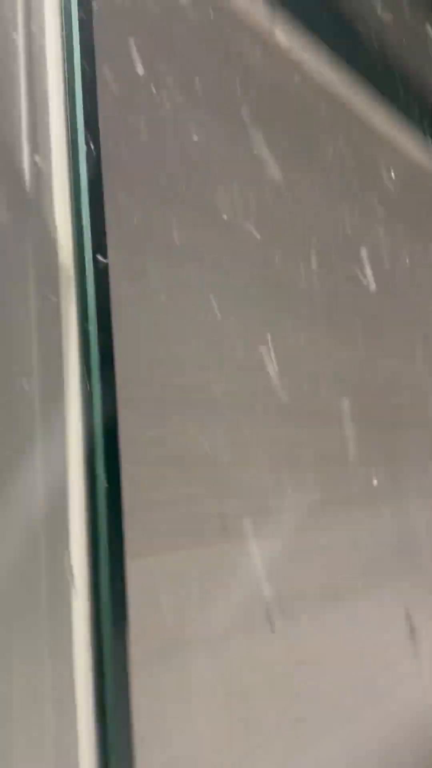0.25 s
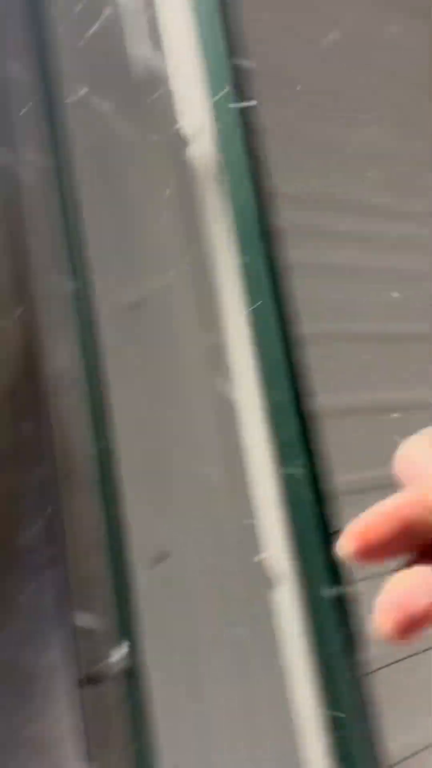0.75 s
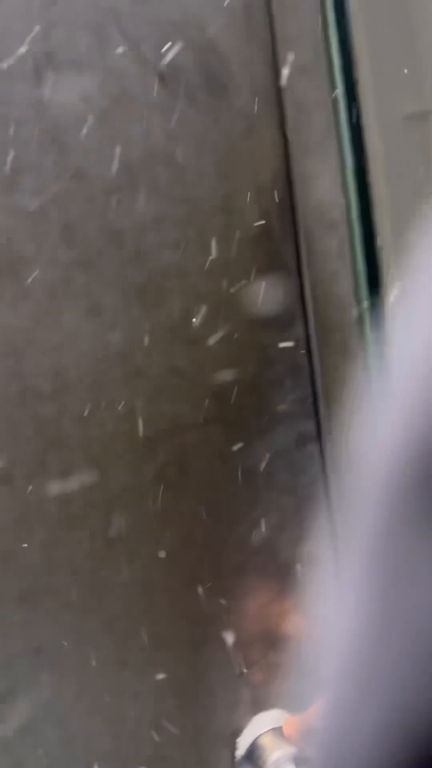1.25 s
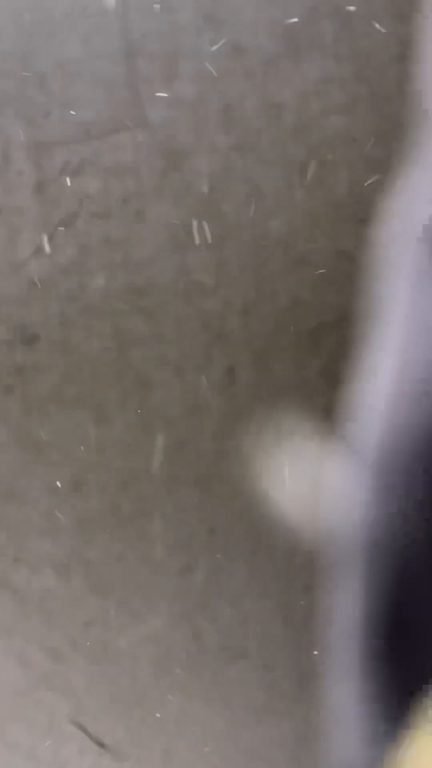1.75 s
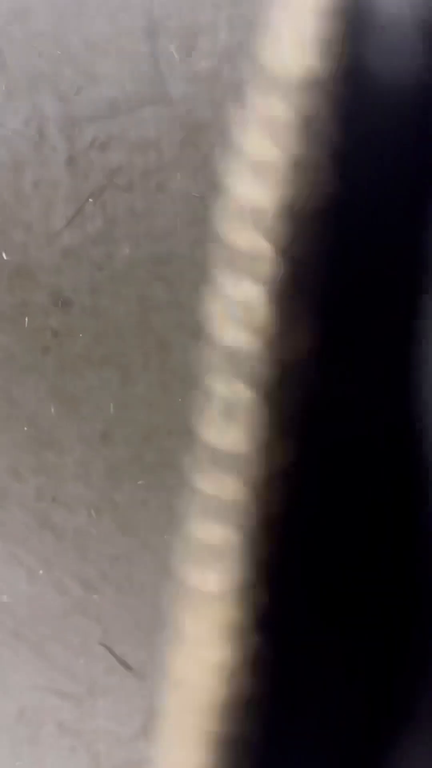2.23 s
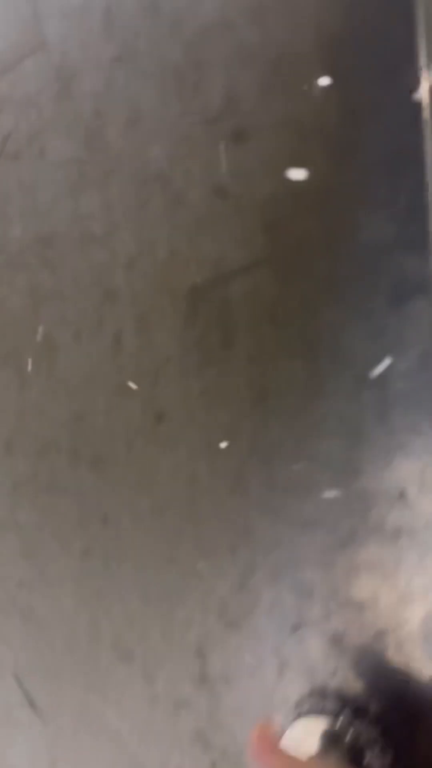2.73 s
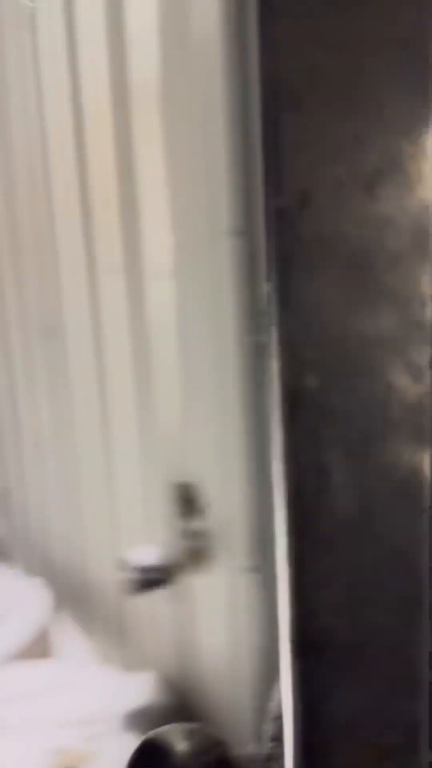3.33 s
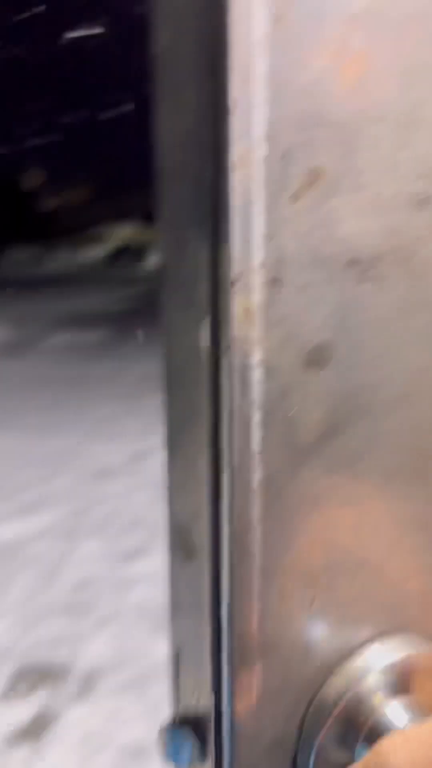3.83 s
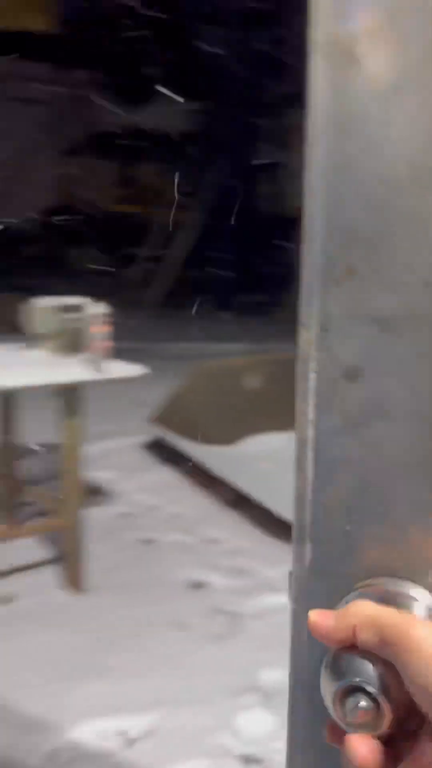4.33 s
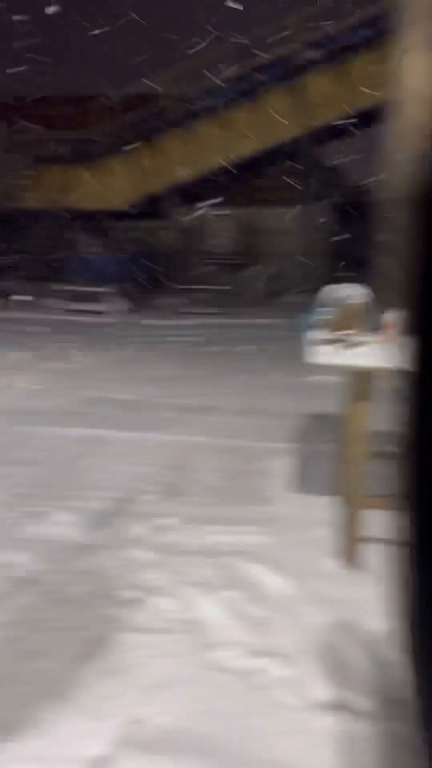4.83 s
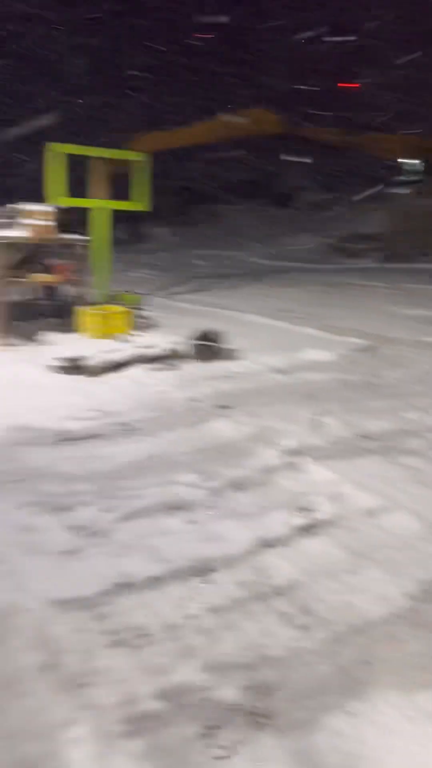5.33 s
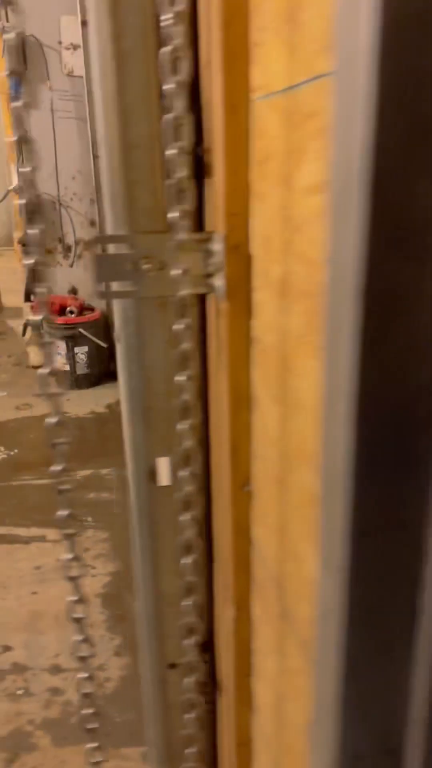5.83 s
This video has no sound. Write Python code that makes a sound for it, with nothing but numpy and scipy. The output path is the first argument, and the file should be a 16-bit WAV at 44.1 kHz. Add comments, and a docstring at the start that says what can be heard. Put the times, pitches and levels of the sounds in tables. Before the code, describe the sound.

Windy yard hum, crunching snowy steps, nylon swishes and one hard microphone knock, followed by a rattling metal latch and a few last steps.

```python
"""On a windy night machinery drones across a yard as someone in a nylon jacket crunches over snow to a steel door.
Snow grains and a zip tick near the hand-held microphone, a boot rings the sill, and the microphone takes a knock.
Later the knob turns, the latch rattles and the door opens, while the steps go on.
Crunches, rubs and rattles are noise or crowds of tiny clicks, filtered or ringing; ticks and thuds are dying waves."""
import sys
import numpy as np
from scipy import signal
from scipy.fft import rfft, irfft, next_fast_len
from scipy.io import wavfile
from scipy.ndimage import uniform_filter1d

SR = 44100
rng = np.random.default_rng(int(sys.argv[2]) if len(sys.argv) > 2 else 0)


def int16_out(signal):
    """Quantize to a 16-bit WAV file."""
    q = np.round(np.clip(np.atleast_2d(signal).T, -1, 1) * 32767)
    wavfile.write(sys.argv[1], SR, q.astype(np.int16))


N = 268128
TIME = np.arange(N) / SR  # the whole scene, in seconds
RING = np.arange(SR // 2) / SR  # half a second, room for one short sound

# In all tables t60_s is the time a ring takes to fall by 60 dB.
# Steady wind on the microphone, before gusts and flutter: [start_s, level_db]
WIND = [(0.0, -54), (0.59, -53), (0.86, -44.5), (1.39, -50), (1.73, -39), (2.73, -45), (2.95, -39.5),
        (6.08, -49)]
# Drone of the yard, before its flutter: [start_s, level_db]
YARD = [(0.0, -50), (0.3, -54.5), (.68, -52), (1.15, -53), (1.3, -56.5), (1.44, -48.5), (1.57, -45.5),
        (1.92, -48.5), (2.3, -45.5), (3.08, -47), (3.32, -45.5), (4.03, -47.5), (4.56, -46.5),
        (4.72, -49.5), (5.1, -45.5), (5.22, -47.5), (5.88, -45), (6.08, -50.5)]
# Tone of the wind: [pitch_hz, relative_db]
WIND_COLOUR = [(20, -29), (40, -6), (65, 1), (120, -3.5), (200, -17), (400, -33), (1200, -69)]
# Tone of the yard drone: [pitch_hz, relative_db]
YARD_COLOUR = [(60, -5.5), (190, -0.5), (310, 3), (500, -1), (750, -9), (1100, -16), (2000, -22.5),
               (5000, -32), (16000, -103)]
# Gusts on top of the steady wind: [strongest_s, length_s, level_db]
GUSTS = [(0.067, .04, -49), (0.834, 0.12, -42.5), (1.692, 0.14, -36), (2.068, 0.027, -29),
         (2.886, 0.076, -34), (3.41, 0.026, -39.5), (4.293, 0.19, -39.5), (4.683, 0.26, -41.5),
         (5.08, 0.021, -41), (5.31, 0.055, -43.5)]
# Motor tones heard in passing, outside and then indoors: [nearest_s, reach_s, pitch_hz, level_db]
HUM = [(2.501, 0.76, 302, -53.5), (2.7, 0.62, 359.4, -49.5), (2.5, 0.71, 180, -62.5), (3.0, 0.57, 418, -64),
       (5.95, 1, 158.5, -50.5), (5.95, 0.19, 238.6, -58), (5.95, 0.59, 325.7, -53)]
EDDY_DB = 1.92  # how unevenly wind and drone swell from band to band

# Body movements that swish the sleeve and shuffle the soles: [fastest_s, length_s, sleeve_db, scuff_db]
MOVES = [(0.005, 0.057, -60, -51.5), (0.41, 0.16, -54, -59), (0.976, 0.07, -58, -50),
         (1.152, 0.061, -49, -77), (1.47, 0.14, -55.5, -51), (1.487, 0.079, -46, -61),
         (1.705, 0.071, -58, -52.5), (2.367, 0.089, -97, -55.5), (2.49, 0.13, -63, -56),
         (2.826, 0.064, -44.5, -46.5), (3.134, 0.14, -53.5, -50), (3.355, 0.07, -51, -61),
         (3.575, 0.11, -51, -56), (3.802, 0.16, -57.5, -47), (4.277, 0.076, -60, -74),
         (4.445, 0.09, -61.5, -70), (4.888, 0.11, -65, -54.5), (5.103, 0.076, -60, -57.5),
         (5.373, 0.08, -63.5, -56.5), (5.768, 0.29, -64, -56), (6.046, 0.11, -82, -54.5)]
# Tone of the nylon sleeve: [pitch_hz, relative_db]
SLEEVE_COLOUR = [(800, -10.5), (2500, 2), (4000, 0.5), (6300, 8), (8200, 7.5), (9700, 3.5), (11500, -23),
                 (13500, -25), (15300, 4.5), (16500, -48)]
# Tone of soles in loose snow: [pitch_hz, relative_db]
SCUFF_COLOUR = [(300, 10.5), (800, 8), (1500, 3), (2200, 1.5), (3300, -13.5), (6000, -7.5), (12000, -45)]
SLEEVE_REST_DB, SCUFF_REST_DB = -72, -65.5  # between movements
SLOWING, SWING_SHAPE = 0.99, 3.7  # fall time as a share of rise time; roundness of the peak

# Footfalls and shifts of weight; crunch levels are relative settings:
# [start_s, heel_db, length_s, tilt_db_per_octave, toe_db, thud_db, thud_hz]
STEPS = [(0.026, -32.5, 0.0074, -6.5, -45, -42, 384), (0.068, -35.5, 0.069, -1, -51.5, -44, 307),
         (0.5, -40.5, 0.041, -2.5, -50, -20, 229), (0.721, -43, 0.084, -1, -79, -43, 295),
         (1.136, -36, 0.037, -2.5, -46.5, -45, 400), (1.564, -32.5, 0.019, -0.5, -57, -30, 890),
         (2.024, -32, 0.045, -1.5, -50, -27, 170), (2.582, -37, 0.015, 0, -73, -53, 300),
         (2.621, -35, 0.014, 2, -73, -51, 300), (2.787, -27, 0.09, -0.5, -61, -24, 420),
         (2.918, -18.5, 0.0091, -4, -40, -22, 236), (3.084, -30.5, 0.033, -8.5, -62, -43, 354),
         (3.207, -28, 0.04, -2, -39, -35, 344), (3.827, -42, 0.023, -4.5, -31, -24.5, 405),
         (4.136, -32, .02, -5, -45, -48, 300), (4.165, -33, 0.023, -8, -50, -17, 232),
         (4.308, -37, 0.014, 1, -62, -17, 131), (4.411, -33, 0.035, -1, -58, -30, 393),
         (4.536, -51, 0.084, 3, -84, -19.5, 168), (4.89, -42, 0.067, -10.5, -65, -22.5, 175),
         (5.053, -40.5, 0.043, -2.5, -68, -42, 300), (5.602, -38.5, 0.014, -1.5, -59, -48, 300),
         (5.669, -27.5, 0.028, -4.5, -34.5, -20, 232), (5.821, -37.5, 0.024, -2.5, -52, -19, 360),
         (6.014, -42, 0.021, 1, -60, -45, 302)]
# Tone of breaking snow: [pitch_hz, relative_db]
SNOW_COLOUR = [(80, -7.5), (300, 10), (750, 7), (1400, -0.5), (2200, 1), (3500, -4), (6500, -3),
               (8500, -6.5), (11500, -29), (15500, -16.5)]
WEIGHT_LAG_S, ROLL_S = 0.01289, 0.1026  # from heel touch to the weight landing, and to the toe
THUD_CYCLES = 6.37  # every thud falls by 60 dB in this many cycles
THUD_FALL_CYCLES, FOOT_GLIDE_OCTAVES = 0.65, 0.96  # how quickly a thud's pitch sinks; how far a foot's sinks

# Dry ticks of snow grains, zip teeth and the knob: [start_s, peak_db, pitch_hz, width_hz]
TICKS = [(0.121, -35, 7000, 4000), (0.134, -17, 5700, 3020), (0.3265, -25, 8000, 4000),
         (0.3282, -18, 7840, 4040), (.488, -33, 3000, 905), (0.7802, -22.5, 1330, 1100),
         (.79, -31, 4200, 2000), (.9499, -14.5, 6100, 1670), (1.0, -16.5, 7400, 2040),
         (1.016, -24, 7500, 5000), (1.0785, -17.5, 8100, 2010), (1.088, -25, 7100, 1600),
         (1.353, -39, 6030, 5000), (1.574, -20.5, 7700, 4000), (1.837, -38.5, 1260, 900),
         (1.8768, -34, 6700, 4500), (1.948, -39.5, 2150, 1500), (2.0708, -13, 5560, 4500),
         (2.322, -37, 1400, 1000), (2.744, -22, 2570, 2300), (2.9183, -15, 3200, 2480),
         (4.147, -34, 900, 800), (4.207, -43, 3220, 2500), (4.392, -34, 2380, 2490),
         (4.403, -35, 1920, 600), (4.431, -26.5, 1690, 1790), (4.653, -44, 6100, 900),
         (4.827, -33.5, 1460, 1690), (5.082, -35, 1500, 1800)]
FAINT_TICKS_PER_S, FAINT_TICK_DB, FAINT_SPREAD_DB = 4.4, -50.5, -12  # extra ticks at random times
FAINT_LOW_HZ, FAINT_HIGH_HZ, FAINT_WIDTH_HZ = 2000, 6500, 3100
SNAP_DB, SNAP_S = -24.5, 0.00023  # the bare snap at the start of a tick
SCATTER_DB, SCATTER_S = -17.5, 0.0051  # the scatter after it

# Bumps of a boot on the steel sill: [start_s, peak_db]
SILL_BLOWS = [(0.506, -29), (0.5163, -28), (.545, -39)]
# Tones at which the sill rings: [pitch_hz, relative_db, t60_s]
SILL = [(990, -7, 0.1), (1300, 1, 0.18), (1420, -4, 0.097), (1610, -1, 0.089), (1933, 0, 0.084),
        (2374, -0.5, 0.12), (2940, -4, 0.087), (3149, -6, 0.13), (3451, -13, 0.12), (3768, -4, .07),
        (4043, 0, 0.066), (4759, -14, .08)]
# Dull bumps of hand, door and heavy footfalls: [start_s, level_db, pitch_hz, glide_down_octaves]
BUMPS = [(0.961, -14, 261, 1.16), (1.049, -22, 195, 1.6), (1.079, -22, 110, 1.4), (2.043, -20.5, 129, 1.8),
         (2.0703, -14, 258, 2.8), (2.805, -12.5, 200, 0.94), (2.832, -16.5, 231, 1.3),
         (2.921, -14, 715, 0.51), (2.9268, -8, 125, 2.78), (2.944, -18.5, 62, .8), (3.7715, -11, 750, 1.3),
         (4.403, -15, 475, 0.48)]
# A hard knock on the microphone's case and its bounces: [start_s, level_db]
KNOCKS = [(1.034, -26), (1.039, -11.5), (1.0402, 0), (1.0452, 1), (1.0496, -11.5)]
# Tones at which the case rings: [pitch_hz, relative_db, t60_s, right_port_phase_radians]
CASE = [(486, -13.5, 0.045, 1.92), (910, -1.5, 0.014, 3.04), (1217, -7, 0.03, 2.68),
        (1430, -9.5, 0.0084, 0.19), (2320, -2.5, 0.0037, 1.1), (3820, -4, 0.0026, 1.35),
        (5820, 1, 0.0025, 2), (6600, -16, 0.0085, 2.2), (10760, -26, 0.0074, 2.6)]
# Rubs, and short gritty crunches of snow grains: [start_s, level_db, length_s, pitch_hz, width_hz, slips_per_s]
RUBS = [(1.568, -36, 0.022, 1150, 1200, 530), (2.039, -35.5, 0.012, 840, 894, 970),
        (2.113, -49, 0.03, 1730, 700, 990), (2.794, -35, .003, 2780, 1400, 2440),
        (2.8225, -35, .003, 3400, 1200, 1800), (2.831, -36, 0.0029, 3000, 1700, 3200),
        (2.865, -36, .003, 4000, 3500, 2500), (2.884, -44, 0.035, 2300, 400, 500),
        (3.089, -44.5, 0.012, 2080, 400, 840), (4.418, -45, 0.016, 1860, 600, 740),
        (4.585, -48, 0.027, 1780, 790, 3100), (4.622, -46.5, 0.0068, 1700, 895, 2600),
        (5.676, -50, 0.032, 1400, 1500, 500), (5.693, -36, 0.014, 595, 500, 940),
        (5.839, -44, 0.0068, 1700, 1800, 840)]
# Small metal parts, such as the zip's pull tab: [start_s, level_db, pitch_hz, t60_s]
JINGLES = [(1.65, -22.5, 7640, 0.076), (1.655, -38, 8200, 0.044), (3.255, -22, 5160, 0.013),
           (5.784, -37.5, 7600, 0.023)]
# Thin squeals of the turning knob and of sliding nylon:
# [loudest_s, length_s, level_db, pitch_hz, width_hz, glide_hz_per_s]
SQUEALS = [(3.343, 0.013, -44, 3530, 280, 5000), (3.1, 0.024, -54, 3440, 380, 2),
           (3.356, 0.0085, -40, 4400, 600, -8000), (3.351, 0.026, -47, 6200, 570, 2000),
           (3.9, 0.064, -61, 6570, 150, 0), (4.1, 0.03, -65, 7200, 190, 0),
           (6.4, 0.06, -53, 6430, 640, -4000), (5.4, 0.033, -59, 6600, 260, 0),
           (5.002, 0.083, -59, 9000, 180, -1400)]
SQUEAL_SLIPS_PER_S, SQUEAL_CATCH_DB = 2200, -1  # how often surfaces slip, and how unevenly

# Clacks of knob, spindle and latch, and a small late crunch; clack levels are relative settings:
# [start_s, clack_db, chatter_s, tilt_db_per_octave, contact_hz, door_leaf_db]
CLACKS = [(3.2087, -24, 0.0075, -1.5, 3640, -36), (3.2115, -21.5, 0.0035, -1.5, 5140, -37),
          (3.2212, -21, 0.0033, 9, 8500, -27), (3.2295, -27, .002, -4, 5040, -41),
          (3.2368, -20, 0.0023, -2, 5100, -48), (3.315, -37.5, 0.0046, -4, 7200, -62),
          (3.484, -28.5, 0.0044, 0.5, 3760, -58), (3.4885, -23, .0012, -4.5, 7660, -54),
          (3.5126, -10, 0.00098, 2.5, 2090, -39.5), (3.584, -38, 0.0018, -5, 990, -41),
          (3.6221, -21.5, 0.0025, 0.5, 5000, -43), (3.634, -31.5, .006, 4, 9040, -52),
          (3.647, -31, 0.0026, 3, 6300, -60), (3.6633, -24, 0.006, -3, 8000, -34),
          (3.673, -25.5, 0.0013, -5, 2670, -54), (3.7123, -25, 0.012, 6, 6430, -41),
          (3.726, -27, 0.0032, -4, 5170, -55), (3.746, -31.5, .004, 4, 7600, -64),
          (3.7685, -17, 0.0026, 5, 8200, -43), (3.7715, -10.5, 0.0016, 6.5, 5930, -25.5),
          (3.8168, -18, 0.00069, -7.5, 1830, -34), (3.836, -37, .001, -5, 1800, -64),
          (3.8437, -23, 0.00098, -9.5, 1780, -58), (3.8475, -31, 0.00078, -1, 4240, -62),
          (3.861, -41, 0.00091, -8, 4200, -65), (4.2207, -25, 0.00078, -5, 1990, -58),
          (4.25, -24.5, .0006, -4.5, 1870, -60), (4.289, -26.5, 0.00077, -4.5, 1950, -62),
          (5.885, -37, 0.0057, -2.5, 6060, -65)]
# Tone of steel striking steel: [pitch_hz, relative_db]
CLACK_COLOUR = [(120, -15), (450, 8), (900, -10), (2000, 4.5), (3500, 3.5), (8000, 4.5), (10500, 0),
                (12500, -12), (15000, -2), (16500, -28)]
# Tones at which the lock rings: [pitch_hz, relative_db, t60_s]
LOCK = [(1080, 6, 0.096), (2090, -5, 0.057), (2520, 2, 0.055), (3070, -4, 0.06), (3540, -2.5, 0.091),
        (4940, -23, 0.053), (4920, -8.5, 0.13), (5940, 3.5, 0.033), (6250, 11, 0.029), (6650, -15, 0.12),
        (7950, 5, 0.054), (8100, 4, 0.034), (9000, -17, 0.073), (9250, 5, 0.057), (10280, 11, 0.046),
        (10700, 6.5, 0.055), (14700, -1, .02)]
# Tones of the steel door leaf, shaken by the lock: [pitch_hz, relative_db, t60_s]
LEAF = [(534, -4.5, 0.046), (699, -2.5, 0.066), (791, -2.5, 0.064), (1058, -7.5, 0.1), (1376, -13, 0.059),
        (1634, -13, 0.063), (2105, -12, 0.052)]
LOCK_DETUNE = .012  # rough share by which tones shift at random from clack to clack
RING_SHARE_DB, CONTACT_DB, CONTACT_T60_S = -2, -3.5, 0.0085  # lock ring, and short ring of the part hit
SIDE_MODE_DB, SIDE_MODE_SPREAD = -8, 0.165  # weaker tones around each main one, within this share of its pitch
GRIT_PER_S, GRIT_DB, GRIT_S = 500, -28, 0.017  # loose parts trembling after a clack

# How far the left microphone port leads the right: [pitch_hz, phase_radians]
PORT_PHASE = [(0, 0), (4200, 0), (5500, -.7), (7500, -1.4), (9500, -2.4), (12000, -3), (16000, -3.8)]
EDGE_HZ = 16500  # upper edge of the sound


def amp(db):
    """Turns decibels into a gain."""
    return 10 ** (np.asarray(db) / 20)


def unit(x):
    """Scales a sound to an average (rms) size of 1."""
    return x / np.sqrt(np.mean(x ** 2) + 1e-20)


def level(curve):
    """Gives a gain for every sample from rows of start_s and level_db."""
    return amp(np.interp(TIME, *np.transpose(curve)))


def add(mix, s, sound):
    """Mixes a sound in at s seconds, cutting it off at the end."""
    part = mix[:, max(round(s * SR), 0):][:, :sound.shape[-1]]
    part += sound[..., :part.shape[1]]


def colour(x, points, tilt_db=0):
    """Filters without pre-echo from pitch_hz and relative_db points, tilted about 2 kHz per octave."""
    size = next_fast_len(x.shape[-1] + 2048)
    hz = np.maximum(abs(np.fft.fftfreq(size, 1 / SR)), 1)
    f, db = np.transpose(points)
    octaves = np.log2(np.maximum(hz, 400) / 2000)  # no further tilt below 400 Hz
    log_gain = np.log(amp(np.interp(np.log(hz), np.log(f), db) + tilt_db * octaves))
    response = np.exp(np.conj(signal.hilbert(log_gain)))  # minimum phase
    return np.fft.ifft(np.fft.fft(x, size) * response).real[..., :x.shape[-1]]


def pair(size, apart):
    """Makes noise for two ports from a shared part and an opposed part."""
    mid, side = rng.standard_normal((2, size))
    return np.array([mid + apart * side, mid - apart * side])


def drift(size, hz):
    """Wanders at random with rms 1, mostly slower than hz."""
    f = np.fft.rfftfreq(size, 1 / SR)
    return unit(irfft(rfft(rng.standard_normal(size)) * np.exp(-(f / hz) ** 2), size))


def grains(size, per_s, spread_db, apart):
    """Scatters clicks of uneven size at random times."""
    at = rng.integers(0, size, max(round(per_s * size / SR), 1))
    sizes = amp(spread_db * np.minimum(rng.exponential(1, len(at)), 3))
    out = np.zeros((2, size))
    out[:, at] = pair(len(at), apart) * sizes
    return unit(out)


def mode(hz, t60, lag=0):
    """Rings as one sine wave that dies away steadily."""
    t = RING[RING < 2 * abs(t60) + .002]
    wave = np.sin(2 * np.pi * hz * t - lag) * np.exp(-np.log(1000) * t / t60)
    return np.pad(wave, (0, len(RING) - len(t)))


def width_t60(width_hz):
    """Finds the ring time of a resonance: the wider it is, the sooner it dies."""
    return np.log(1000) / np.pi / width_hz


def swell(s, length):
    """Builds up to 1 at s seconds and falls away again."""
    u = (TIME - s) / length
    return np.exp(-np.minimum(np.maximum(-u, u / SLOWING), 8) ** SWING_SHAPE)


def swells(rest, rows):
    """Adds the power of swells (peak_s, length_s, level_db) to a resting gain."""
    return np.sqrt(rest ** 2 + sum((amp(db) * swell(s, length)) ** 2 for s, length, db in rows))


def press(length):
    """Squeezes quickly and eases off over about length seconds."""
    u = RING / length
    return (1 - np.exp(-u / 0.072)) * np.exp(-u ** 2 * 0.59)


def crackle(per_s, cycles, spread_db):
    """Breaks in grains from low to high pitch, each ringing for a few cycles."""
    out = np.zeros((2, N))
    for hz in np.geomspace(350, 15000, num=22) * rng.uniform(0.88, 1.045, size=22):
        ring = mode(hz, 2.2 * cycles / hz)[:1024]
        ring = ring[None] / np.linalg.norm(ring)
        train = grains(N, per_s * np.sqrt(hz / 2000), spread_db, 0.59)
        out += signal.oaconvolve(train, ring, axes=1)[:, :N] * np.sqrt(hz)
    return unit(out)


def thud(db, hz, glide_octaves):
    """Pushes dully, starting high and sinking in pitch; the lower it is, the longer it lasts."""
    cycles = RING * hz
    pitch = hz * 2 ** (glide_octaves * np.exp(-cycles / THUD_FALL_CYCLES))
    angle = 2 * np.pi * np.cumsum(pitch) / SR
    push = np.sin(angle) + 0.19 * np.sin(1.695 * angle)
    return amp(db) * push * (1 - np.exp(-cycles / 0.66)) * np.exp(-np.log(1000) * cycles / THUD_CYCLES)


def strike(contacts, modes, detune=0):
    """Rings a body with tiny contacts; each call flips its tones at random and wakes weak ones around them."""
    ring = 0
    for hz, db, t60 in modes:
        main_hz = hz * (1 + detune * rng.uniform(-1.03, 1))
        ring += rng.choice([-1, 1]) * amp(db) * mode(main_hz, t60)
        for side in -1, 1:
            side_hz = hz * (1 + side * SIDE_MODE_SPREAD * rng.random())
            ring += rng.choice([-1, 1]) * amp(db + SIDE_MODE_DB) * mode(side_hz, t60 / 2)
    return signal.fftconvolve(contacts, ring[None] / np.linalg.norm(ring), axes=1)[:, :len(RING)]


def eddies(x):
    """Makes neighbouring bands swell and sink on their own, as moving air does."""
    z = signal.stft(x, nperseg=2048)[2]
    field = rng.standard_normal(z.shape[:0:-1])  # time frames by pitch bands
    field = uniform_filter1d(field, size=3, axis=0)
    field = uniform_filter1d(field, size=7, axis=1)
    return signal.istft(z * amp(EDDY_DB * unit(field).T), nperseg=2048)[1][:, :N]


def air():
    """Gusts buffet the ports as low noise over the drone and hum of machinery."""
    gusts = pair(N, 1 / 3)  # each port catches some eddies of its own
    wind = unit(colour(gusts, WIND_COLOUR)) * swells(level(WIND), GUSTS) * amp(1.3 * drift(N, 14))
    drone = unit(colour(pair(N, 0.35), YARD_COLOUR)) * level(YARD) * amp(1.5 * drift(N, 36))
    hum = 0
    for s, reach, hz, db in HUM:
        passing = amp(db) * np.exp(-((TIME - s) / reach) ** 2)
        hum += passing * np.sqrt(2) * np.sin(2 * np.pi * hz * TIME + .35 * drift(N, 5.0))
    return eddies(wind + drone) + hum


def rustle():
    """With each movement nylon threads slip in a fine hiss and soles shuffle loose snow in coarser grains."""
    threads = grains(N, 13000, 3.2, 0.32)
    loose = crackle(200, 5, 3)
    arms = swells(amp(SLEEVE_REST_DB), [(s, length, db) for s, length, db, _ in MOVES])
    feet = swells(amp(SCUFF_REST_DB), [(s, length, db) for s, length, _, db in MOVES])
    sleeve = unit(colour(threads, SLEEVE_COLOUR)) * arms * amp(2.36 * drift(N, 33))
    scuff = unit(colour(loose, SCUFF_COLOUR)) * feet * amp(3.23 * drift(N, 23))
    return sleeve + scuff


def steps():
    """Snow gives way in clumps of tiny fractures under heel and toe, with the thud of the weight between them."""
    out = np.zeros((2, N))
    clumps = crackle(170, 7, 3.5)
    fractures = clumps + 0.85 * grains(N, 3000, 4.3, 0.15)
    fractures = np.tile(fractures * amp(2 * drift(N, 120)), 2)  # repeated so late steps have enough
    for start, heel_db, length, tilt_db, toe_db, thud_db, thud_hz in STEPS:
        for s, db in (start, heel_db), (start + ROLL_S, toe_db):
            cracks = fractures[:, max(round(s * SR), 0):][:, :len(RING)] * press(length)
            crunch = colour(cracks, SNOW_COLOUR, tilt_db)
            # rms lies under the peak, and a short crunch fills little of the half second
            add(out, s, amp(db - 8.0) * unit(crunch) * np.sqrt(length / RING[-1]))
        add(out, start + WEIGHT_LAG_S, thud(thud_db, thud_hz, FOOT_GLIDE_OCTAVES))
    return out * amp([[-.3], [.3]])  # slightly to the right


def faint_ticks():
    """Draws weak extra ticks at random times, levels and pitches."""
    rows = []
    for when, size, pitch in rng.random((round(FAINT_TICKS_PER_S * N / SR), 3)):
        db = FAINT_TICK_DB + FAINT_SPREAD_DB * (2 * size - 1)
        hz = FAINT_LOW_HZ + pitch * (FAINT_HIGH_HZ - FAINT_LOW_HZ)
        rows.append((when * N / SR, db, hz, FAINT_WIDTH_HZ))
    return rows


def ticks():
    """Each tick is a few swelling and dying cycles with a bare snap and a brief scatter."""
    out = np.zeros((2, N))
    for s, db, hz, width_hz in TICKS + faint_ticks():
        ring = RING * mode(hz, width_t60(width_hz))
        noise = pair(len(RING), 0.76)
        snap = noise * np.exp(-RING / SNAP_S)
        scatter = colour(noise[:, :2048] * np.exp(-RING[:2048] / SCATTER_S), SNOW_COLOUR)
        add(out, s, amp(db) * (ring / abs(ring).max() + amp(SNAP_DB) * snap))
        add(out, s, amp(db + SCATTER_DB) * scatter)
    return out


def sill():
    """A boot's burst of tiny contacts rings the steel sill."""
    out = np.zeros((2, N))
    for s, db in SILL_BLOWS:
        contacts = grains(len(RING), 5000, 1.6, 0.38) * np.exp(-RING / 0.0039)
        bare_contacts = colour(contacts, [(300, 14), (3500, 2.5), (4800, -1), (6500, -18)])
        bump = strike(contacts, SILL) + 0.59 * bare_contacts
        add(out, s, amp(db) * bump / abs(bump).max())
    return out


def bumps():
    """Hand, door and heavy footfalls bump dully, as well damped thuds that sink in pitch."""
    out = np.zeros((2, N))
    for s, db, hz, glide_octaves in BUMPS:
        add(out, s, thud(db, hz, glide_octaves))
    return out


def knock():
    """The case rocks between the two ports and rings out of step in them."""
    out = np.zeros((2, N))
    ring = 0
    for hz, db, t60, lag in CASE:
        both = np.array([mode(hz, t60), mode(hz, t60, -lag)])
        ring += amp(db) * both * (1 - np.exp(-RING * hz))
    for s, db in KNOCKS:
        add(out, s, amp(db) * ring)
    return out


def rubs_and_crunches():
    """Uneven tiny slips or breaking grains excite one resonance in each rub or gritty crunch."""
    out = np.zeros((2, N))
    for s, db, length, hz, width_hz, slips_per_s in RUBS:
        slips = grains(len(RING), slips_per_s, 0.69, 0.15)
        ring = mode(hz, width_t60(width_hz))[None]
        rub = signal.fftconvolve(slips, ring, axes=1)[:, :len(RING)]
        add(out, s, amp(db) * unit(rub) * press(length))
    return out


def jingles():
    """Small metal parts ring on one tone each, with a soft start."""
    out = np.zeros((2, N))
    for s, db, hz, t60 in JINGLES:
        add(out, s, amp(db) * mode(hz, t60) * (1 - np.exp(-RING / 0.0032)))
    return out


def squeals():
    """Smooth surfaces slide: fine slips feed a narrow resonance that glides in pitch."""
    out = np.zeros((2, N))
    t = RING - RING[-1] / 2
    for s, length, db, hz, width_hz, hz_per_s in SQUEALS:
        turn = np.exp(2j * np.pi * np.cumsum(hz + hz_per_s * t) / SR)
        slips = grains(len(RING), SQUEAL_SLIPS_PER_S, 2.3, 0.25)
        # shift the gliding pitch down to zero, keep a narrow band there, then shift it back
        narrow = signal.butter(2, width_hz / 2, fs=SR, output="sos")
        ring = (turn * signal.sosfilt(narrow, slips / turn + 1e-18)).real
        uneven = unit(ring * amp(SQUEAL_CATCH_DB * drift(len(RING), 70)))
        add(out, s + t[0], amp(db) * uneven * np.exp(-(t / length) ** 2))
    return out


def clacks():
    """Chattering contacts ring lock and door leaf; each clack's tones are shifted a little at random."""
    out = np.zeros((2, N))
    for s, db, length, tilt_db, contact_hz, leaf_db in CLACKS:
        contacts = grains(len(RING), 9000, 0.8, 0.15) * np.exp(-RING / length)
        contacts += amp(GRIT_DB) * grains(len(RING), GRIT_PER_S, 3.6, 0.22) * np.exp(-RING / GRIT_S)
        lock = amp(RING_SHARE_DB) * strike(contacts, LOCK, LOCK_DETUNE)
        part_hit = amp(CONTACT_DB) * strike(contacts, [(contact_hz, 0, CONTACT_T60_S)])
        clack = colour(lock + part_hit + contacts, CLACK_COLOUR, tilt_db)
        add(out, s, amp(db - 7.0) * unit(clack) * np.sqrt(length / RING[-1]))
        leaf = 0
        for hz, mode_db, t60 in LEAF:
            shifted_hz = hz * (1 + LOCK_DETUNE * rng.uniform(-3.4, 3.6))
            leaf += rng.choice([-1, 1]) * amp(mode_db) * mode(shifted_hz, t60)
        add(out, s, amp(leaf_db) * leaf)
    return out


def wall(x):
    """The steel wall returns a short scatter of echoes, modelled as dying noise after a 4 ms gap."""
    tail = pair(len(RING), 0.13) * np.exp(-np.log(1000) * RING / 0.092) * (RING > .004)
    tail = colour(tail, [(200, 23.0), (2500, 2.5), (8000, 5.5), (16000, -17)])
    return signal.fftconvolve(x, tail / np.linalg.norm(tail[0]), axes=1)[:, :N]


def ports(x):
    """The treble reaches the two microphone ports out of step."""
    turn = np.exp(.5j * np.interp(np.fft.rfftfreq(N, 1 / SR), *np.transpose(PORT_PHASE)))
    return irfft(rfft(x) * np.array([turn, turn.conj()]), N)


def scene():
    """Mixes steps and door by the wall with clothes and weather at the microphone."""
    near = steps() + sill() + bumps() + rubs_and_crunches() + squeals() + clacks()
    at_microphone = air() + rustle() + ticks() + jingles()
    case = knock()
    heard = ports(near + amp(-18.5) * wall(near) + at_microphone)
    return heard + case + amp(-22) * wall(case)


def record(dry):
    """Cuts the highest treble at the recorder's band limit."""
    low_pass = signal.firwin(511, EDGE_HZ, window=("kaiser", 9), fs=SR)
    return signal.oaconvolve(dry, low_pass[None], "same", axes=1)


dry = scene()
out = record(dry)
int16_out(out)
```